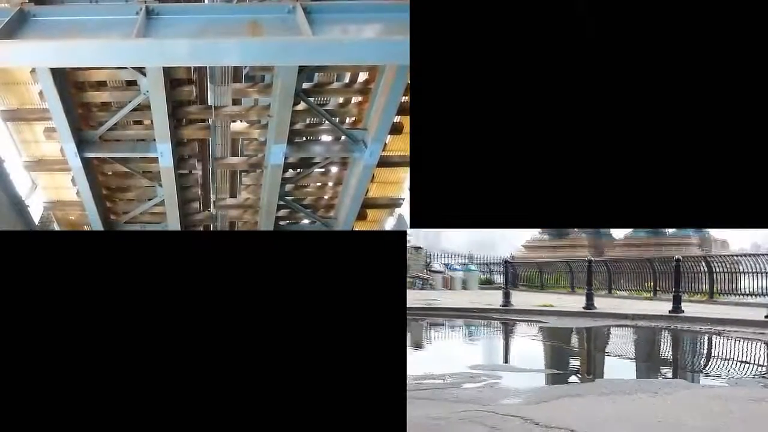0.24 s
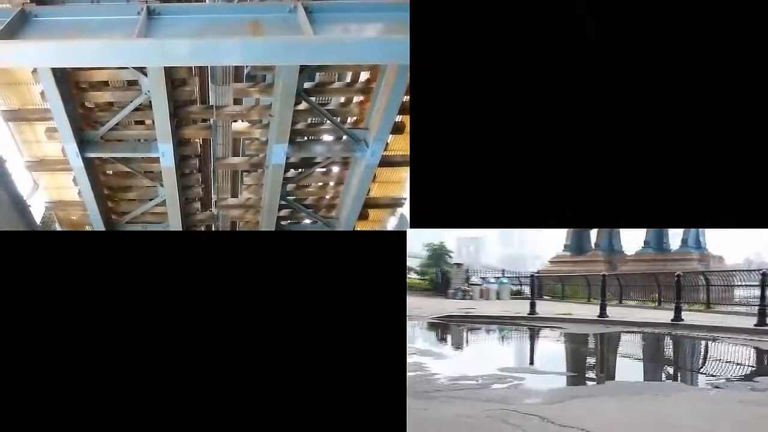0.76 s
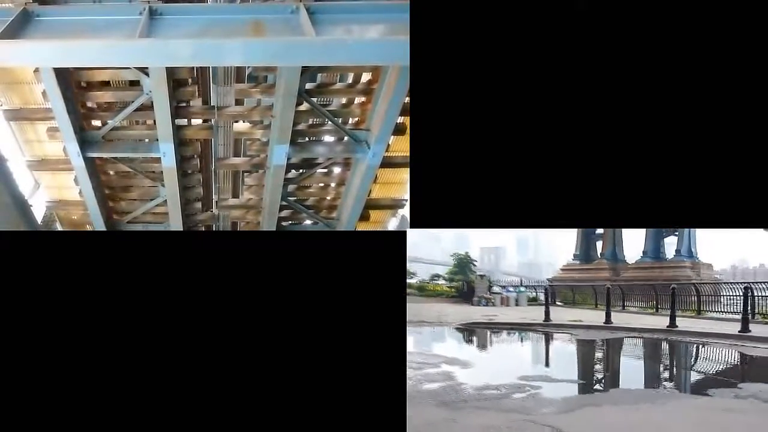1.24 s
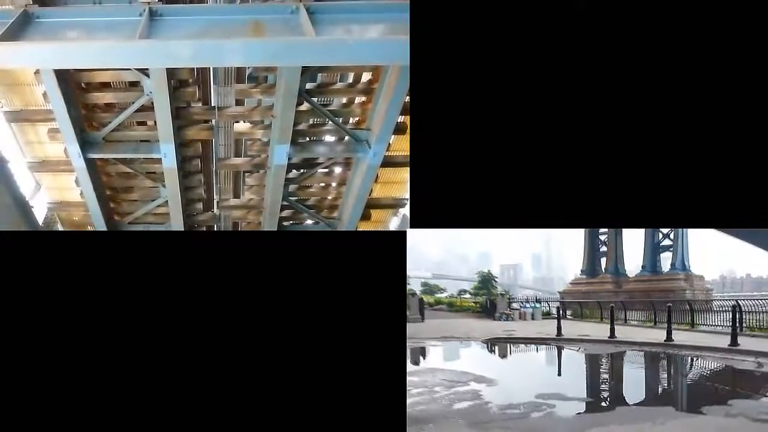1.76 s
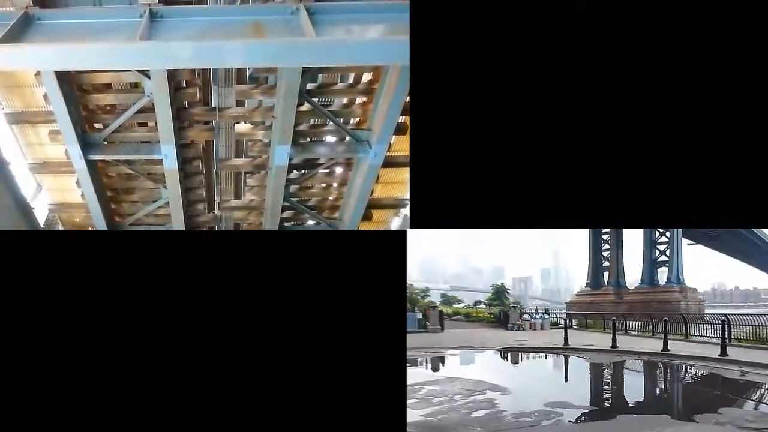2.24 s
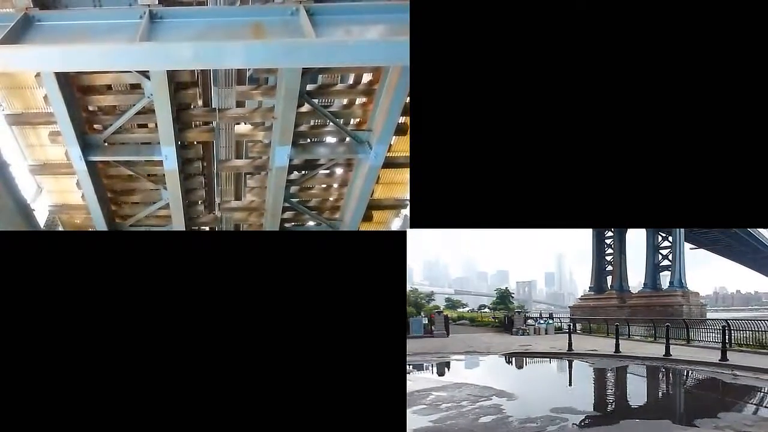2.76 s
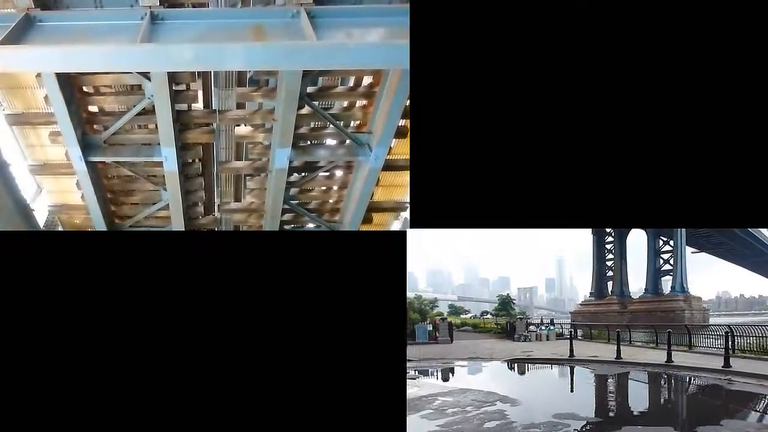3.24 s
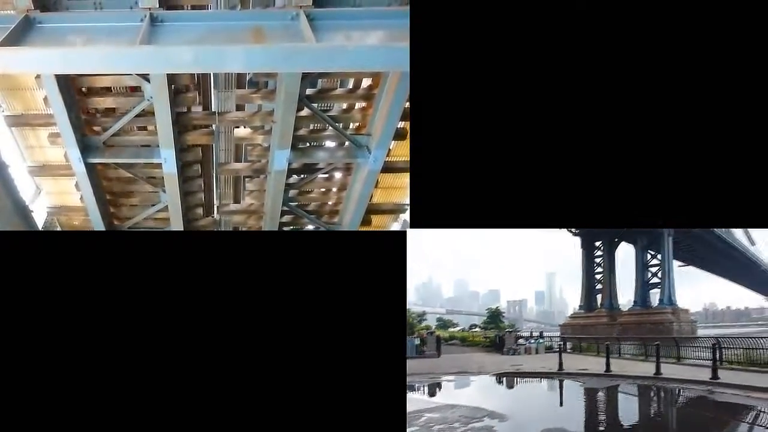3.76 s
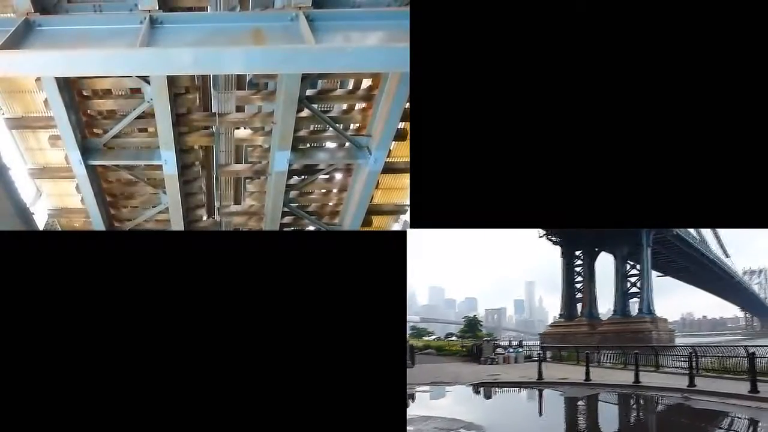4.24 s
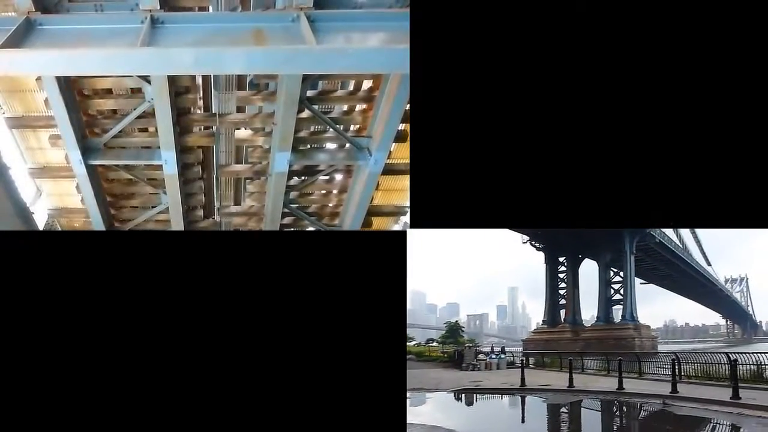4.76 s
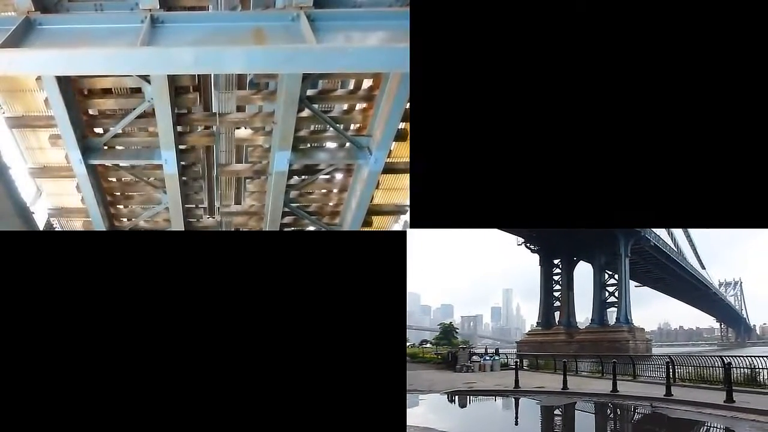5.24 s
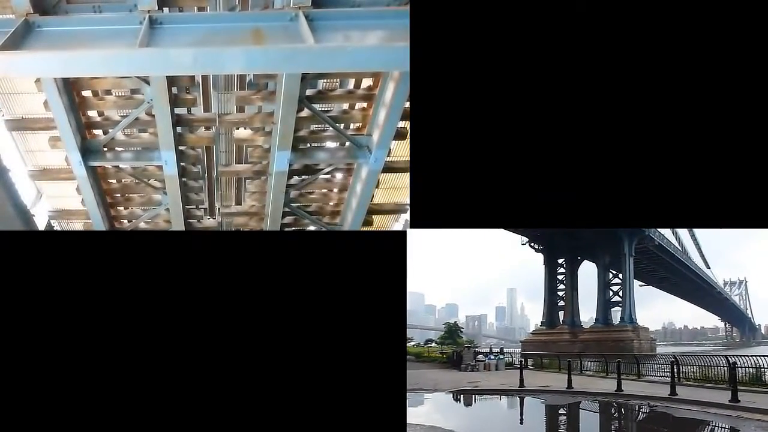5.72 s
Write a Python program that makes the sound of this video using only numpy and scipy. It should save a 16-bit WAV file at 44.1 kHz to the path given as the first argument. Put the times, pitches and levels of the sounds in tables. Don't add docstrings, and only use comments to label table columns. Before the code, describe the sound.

Constant low roar of a train on a steel deck above, with irregular clanks, dull slaps, short metallic rings and sharp clicks at the end.

```python
import sys
import numpy as np
from scipy import signal
from scipy.fft import rfft, irfft, next_fast_len
from scipy.io import wavfile
from scipy.ndimage import uniform_filter1d

SR = 44100
rng = np.random.default_rng(int(sys.argv[2]) if len(sys.argv) > 2 else 0)


def linear_from_db(decibels):
    return 10 ** (np.asarray(decibels, float) / 20)


def persist_wave(psi):
    counts = np.round(np.clip(psi, -1, 1) * 32767).astype(np.int16)
    wavfile.write(sys.argv[1], SR, np.atleast_2d(counts).T)


N = 264159
TIME = np.arange(N) / SR
SIZE = next_fast_len(N)
FREQ = np.maximum(np.arange(SIZE // 2 + 1) * SR / SIZE, 1)


def along(table):
    hz, value = np.transpose(table)
    return np.interp(np.log(FREQ), np.log(np.maximum(hz, 1)), value)


def shaped(x, gain):
    return irfft(rfft(x, SIZE) * gain, SIZE)[..., :N]


def unit(x):
    return x / np.sqrt(np.mean(x ** 2))


def walk(rate_per_s):
    hold = int(SR / rate_per_s)
    steps = np.repeat(rng.standard_normal(N // hold + 1), hold)
    smooth = uniform_filter1d(uniform_filter1d(steps, hold), hold)
    return unit(smooth[:N])


def spread(gain, grit_db):
    # pitch_hz [Hz], likeness [0 to 1]
    likeness = [(30, 0.86), (100, 0.99), (500, 1), (1000, 0.95), (2000, 0.95), (3300, 0.86), (5500, 0.78),
                (7500, 0.79)]
    mid, side = rng.standard_normal((2, N)) * linear_from_db(grit_db * rng.exponential(size=N))
    alike = np.clip(along(likeness), 0, 1)
    mid = shaped(mid, gain * np.sqrt(1 + alike))
    side = shaped(side, gain * np.sqrt(1 - alike))
    return unit(np.array([mid + side, mid - side]))


def scene_change_clicks():
    # start_s [s], left height [full scale], right height [full scale], half width [ms]
    jumps = [
        (5.91941, -.08, -.08, .022),
        (5.94956, .62, .27, .042),
        (5.94968, -.6, -.2, .026),
        (5.94974, .65, .6, .016),
        (5.95527, -.15, -.1, .016),
        (5.95530, 1.05, .55, .016),
    ]
    # middle_s [s], half width [s], level_db [dB]
    hiss = (5.951, .0075, -35)
    # pitch_hz [Hz], level_db [dB]
    click_colour = [(1500, -20), (4000, 0), (15600, 0), (15900, -50)]
    spikes = np.zeros((2, N))
    for start_s, left, right, half_ms in jumps:
        pulse = np.exp(-((TIME - start_s) * 1000 / half_ms) ** 2)
        spikes += np.outer((left, right), pulse)
    middle_s, half_s, level_db = hiss
    swell = linear_from_db(level_db) * np.exp(-((TIME - middle_s) / half_s) ** 4)
    fizz = swell * shaped(rng.standard_normal(N), linear_from_db(along(click_colour)))
    return shaped(spikes, linear_from_db(along(click_colour[1:]))) + fizz


def rail_and_wheel_tones():
    # pitch_hz [Hz], width_hz [Hz], flicker_db [dB]
    bands = [(803, 50, 1.5), (3364, 340, 3)]
    # loudest_s [s], top_db [dB], low_db [dB], span_s [s]
    swells = [
        (4.7, -36, -50.5, 2.1),
        (4.64, -47, -53, 0.36),
    ]
    total = 0
    for (hz, width_hz, flicker_db), (loudest_s, top_db, low_db, span_s) in zip(bands, swells):
        band = spread(1 / (1 + (2 * (FREQ - hz) / width_hz) ** 2), grit_db=3.0)
        level_db = low_db + (top_db - low_db) * np.exp(-((TIME - loudest_s) / span_s) ** 2)
        total = total + linear_from_db(level_db + flicker_db * walk(9)) * band
    return total


def plate_rings():
    # start_s [s], pitch_hz [Hz], level_db [dB], time to fall 60 dB [s]
    plates = [
        (4.245, 3350, -33, .14),
        (5.695, 1330, -28, .16),
        (5.75, 1270, -29, .14),
        (1.51, 1700, -31, .15),
        (5.082, 330, -12, .12),
        (2.965, 290, -17, .15),
        (3.235, 620, -23, .1),
        (5.89, 230, -18, .2),
        (.64, 700, -18, .08),
        (.58, 360, -15, .1),
    ]
    total = np.zeros(N)
    wavering_time = np.cumsum(np.exp(0.0117 * walk(60))) / SR
    for start_s, hz, level_db, t60_s in plates:
        t = np.maximum(TIME - start_s, 0)
        fade = linear_from_db(level_db - 60 * t / t60_s) * (1 - np.exp(-t / 0.0015))
        total += fade * np.sin(2 * np.pi * hz * wavering_time)
    return total


def joint_knocks():
    # start_s [s], clatter_db [dB], fall_s [s], brightness_db [dB]
    axles = [(0.077, -34, 0.072, 1.1), (0.264, -31.5, 0.16, 3), (0.52, -39.5, 0.085, -2.1),
             (0.777, -31, 0.075, 3), (1.198, -40, 0.24, -11), (1.489, -26.5, 0.11, -2.5),
             (1.73, -33, 0.22, -2), (1.971, -31.5, 0.15, -2), (2.177, -33.5, 0.2, 3),
             (2.554, -34, 0.044, 4), (2.74, -33, 0.082, 1), (2.955, -33, 0.055, -1),
             (3.201, -32.5, 0.17, -3), (3.243, -29, 0.023, 6), (3.509, -26.5, 0.12, -2.5),
             (3.753, -35, 0.19, -1), (3.849, -34, 0.033, 9), (4.016, -33.5, 0.19, 6),
             (4.108, -39, 0.025, -5), (4.29, -32, 0.1, 1.1), (4.49, -35.5, 0.22, 4),
             (4.828, -27.5, 0.072, -3), (4.914, -31, 0.04, -7), (5.439, -39, 0.11, -14),
             (5.647, -30.5, 0.23, -0.6)]
    # start_s [s], clatter_db [dB], fall_s [s], brightness_db [dB]
    slaps = [
        (0.985, -21.5, 0.033, -3),
        (1.268, -21, 0.023, 1),
        (1.79, -24, 0.033, -2.1),
        (3.273, -19, 0.019, -4),
        (3.575, -25, 0.01, 5),
        (4.235, -20.5, 0.036, 6),
        (5.079, -15.5, 0.01, -2),
        (5.172, -22, 0.014, -3),
    ]
    # pitch_hz [Hz], level_db [dB]
    clatter_colour = [(900, -24), (1300, 2.5), (1800, -1.5), (3000, -4.5), (4500, -6), (6500, -13),
                      (7200, -19), (7900, -50)]
    # pitch_hz [Hz], level_db [dB]
    thud_colour = [(90, -26), (160, -3), (320, 10), (550, 7), (900, 1.5), (1400, -36)]
    power = np.zeros((3, N))
    for blows, rise, thud_db in ((axles, 0.17, 10), (slaps, 1.2, 15)):
        for start_s, level_db, fall_s, bright_db in blows:
            t = np.maximum(TIME - start_s, 0)
            swell = linear_from_db(level_db) * (1 - np.exp(-(t / max(rise * fall_s, 0.002)) ** 2))
            layers = [(-bright_db / 2, 1), (bright_db / 2, 0.9), (thud_db, 0.5)]  # dB, share of the fall
            for k, (gain_db, shorter) in enumerate(layers):
                fade = np.exp(-t / max(shorter * fall_s, 0.005))
                power[k] += (linear_from_db(gain_db) * swell * fade) ** 2
    clank, sizzle, thud = np.sqrt(power)
    clatter = spread(linear_from_db(along(clatter_colour)), grit_db=1.5)
    low = shaped(clatter, 1 / (1 + (FREQ / 3300) ** 4))
    high = clatter - low
    chatter = linear_from_db(0.5 * walk(45))
    bright = chatter * (clank * low + sizzle * high)
    return bright + thud * spread(linear_from_db(along(thud_colour)), grit_db=2.5)


def rolling_roar():
    handovers_hz = (180, 600, 1300)
    # pitch_hz [Hz], level_db [dB per Hz]
    steel_colour = [(15, -51), (25, -23), (59, -13.5), (101, -2.5), (138, -1.5), (345, -2.5), (399, -6),
                    (450, -4), (615, -7.5), (841, -8), (1020, -14.5), (4430, -27), (6670, -36.5),
                    (7350, -47), (7900, -62.5), (10300, -90), (17400, -120)]
    # pitch_hz [Hz], width_hz [Hz], level_db [dB]
    humps = [(101, 32, 2), (216, 36, 0.5), (347, 43, 3.5), (423, 16, 1), (836, 130, -1.5),
             (1700, 200, -0.5), (3470, 270, -2.5)]
    # time_s [s], level_db [dB]
    wheel_load = [(0.0, -22.5), (0.05, -21), (1.1, -20.5), (1.12, -22.5), (2.78, -20), (2.94, -23),
                  (2.99, -16), (3.0, -21.5), (3.15, -22), (3.25, -18), (3.3, -23), (3.57, -20.5),
                  (3.72, -23), (3.8, -21.5), (5.14, -21.5), (5.24, -26), (5.91, -23), (5.99, -16.5)]
    # level_db at mean load [dB], share of load swings followed, fade [dB per s], heave_db [dB]
    parts = [
        (-29, -0.17, 0.19, 0.5),
        (-22.5, 0.94, -0.2747, 0.64),
        (-30, 0.59, -0.21, 1.28),
        (-33, .15, -0.4045, -0.5),
    ]
    load_db = np.interp(TIME, *np.transpose(wheel_load)) + 22.5
    load_db = uniform_filter1d(load_db, size=600)
    colour_db = along(steel_colour)
    for hz, width_hz, db in humps:
        colour_db = colour_db + db / (1 + (2 * (FREQ - hz) / width_hz) ** 2)
    colour = linear_from_db(colour_db)
    below = [0, *(1 / (1 + (FREQ / hz) ** 8) for hz in handovers_hz), 1]
    flicker_db = (0.11, 0.13, 0.87, 0.56)
    shake_db = (0.092, 0.58, 0.37, 0.28)
    shake = walk(30)
    total = 0
    for k, (level_db, share, fade_db, heave_db) in enumerate(parts):
        part = spread(colour * np.sqrt(np.maximum(below[k + 1] - below[k], 0)), grit_db=1.5)
        slow_db = level_db + share * load_db + fade_db * TIME + heave_db * walk(6.09)
        total = total + part * linear_from_db(slow_db + flicker_db[k] * walk(14) + shake_db[k] * shake)
    return total


def scene():
    return rolling_roar() + joint_knocks() + rail_and_wheel_tones() + plate_rings()


def roll_off(x):
    return signal.sosfilt(signal.butter(12, 15880, fs=SR, output="sos"), x)


def record(dry):
    # pitch_hz [Hz], left minus right [dB]
    hole_level = [(60, -2.2), (300, -1.4), (1500, -1.4), (2200, -1), (3000, 0.5), (4000, 0.5), (5300, 3),
                  (7500, 0.5)]
    # pitch_hz [Hz], left lead [radians]
    hole_lead = [(60, 0.05), (250, -0.093), (500, -0.29), (1000, -0.42), (1500, -0.57), (4300, -0.64),
                 (6000, 0.091), (7200, 0)]
    # pitch_hz [Hz], level_db [dB]
    microphone = [(20, -15), (35, -3), (48, 3), (65, -2.5), (90, 0), (7400, 0.5), (7650, 2), (7800, -10),
                  (7870, -35), (8000, -62)]
    # pitch_hz [Hz], level_db [dB]
    mirror_leak = [(8120, -50), (8300, -1), (9000, -11), (10000, -20), (11000, -28.5), (12000, -39),
                   (13000, -55), (13600, -92)]
    slow_rate_hz = 16000
    lean = linear_from_db(along(hole_level) / 2) * np.exp(0.5j * along(hole_lead))
    direct_gain = linear_from_db(along(microphone)) * (FREQ < slow_rate_hz / 2)
    direct = shaped(dry, np.array([lean, 1 / lean]) * direct_gain)
    folded = 2 * direct * np.cos(2 * np.pi * slow_rate_hz * TIME)
    mirror = shaped(folded, linear_from_db(along(mirror_leak)) * (FREQ > slow_rate_hz / 2))
    return roll_off(direct + mirror + scene_change_clicks())


dry = scene()
out = record(dry)
persist_wave(out)
```